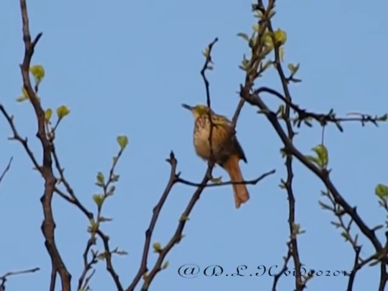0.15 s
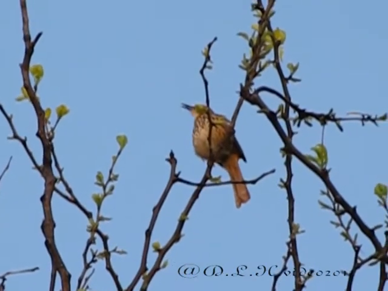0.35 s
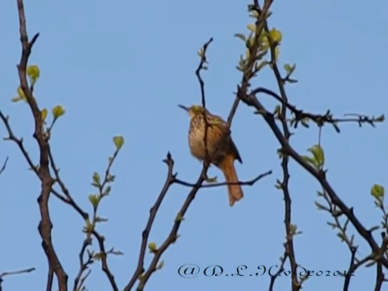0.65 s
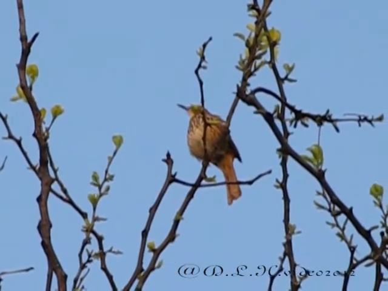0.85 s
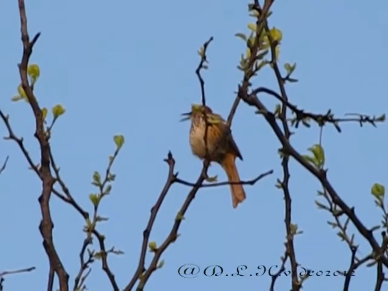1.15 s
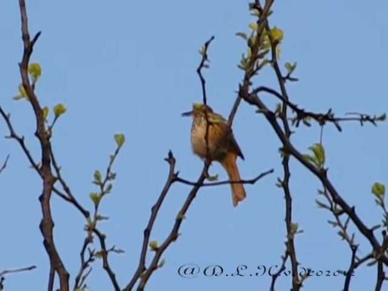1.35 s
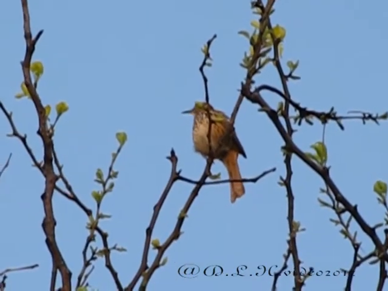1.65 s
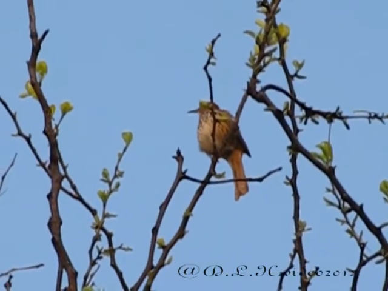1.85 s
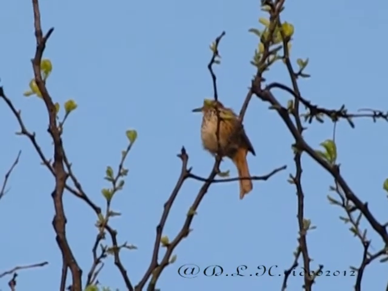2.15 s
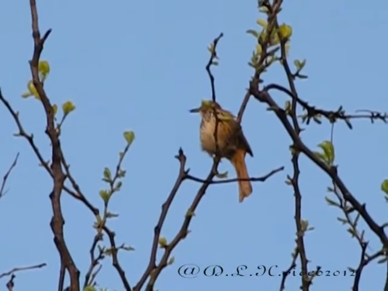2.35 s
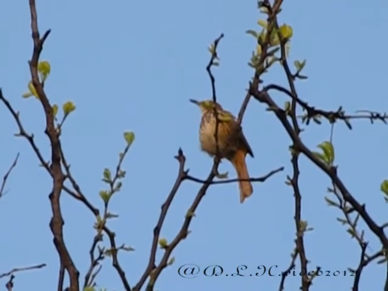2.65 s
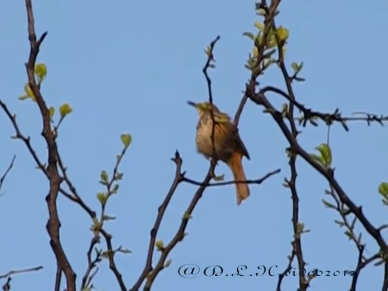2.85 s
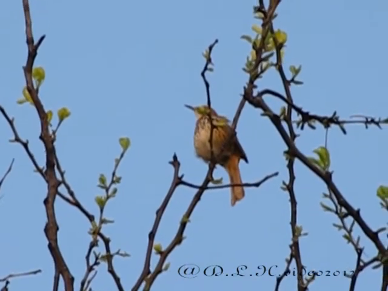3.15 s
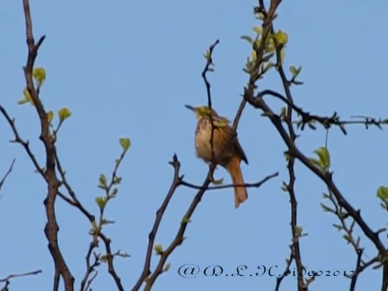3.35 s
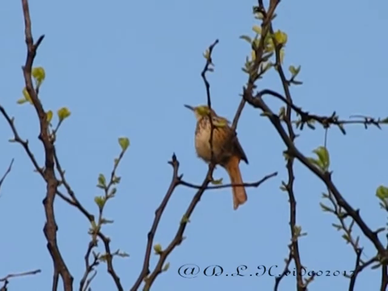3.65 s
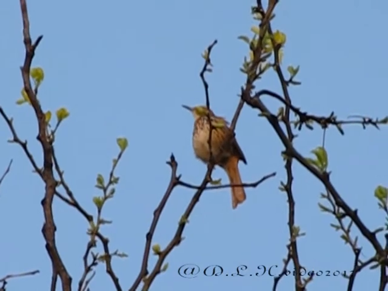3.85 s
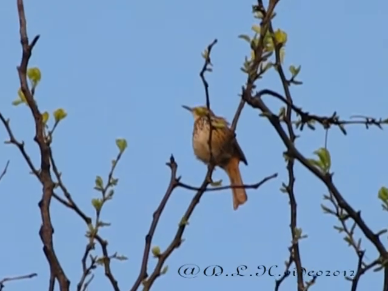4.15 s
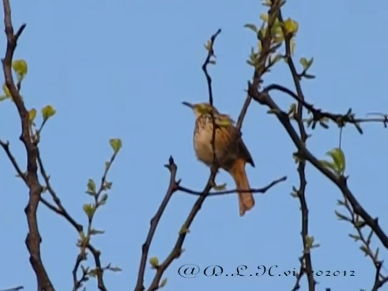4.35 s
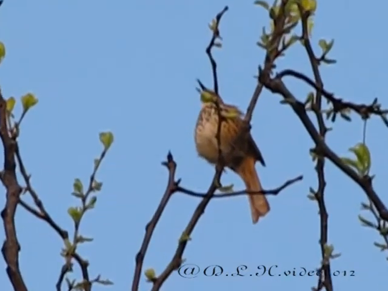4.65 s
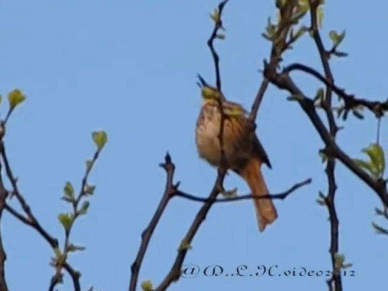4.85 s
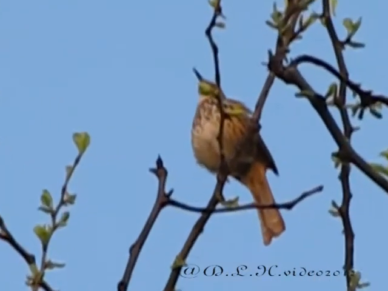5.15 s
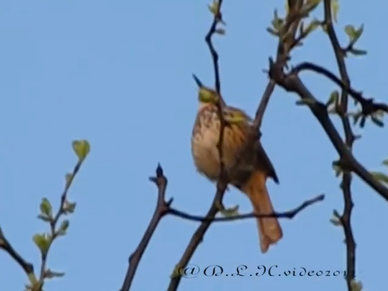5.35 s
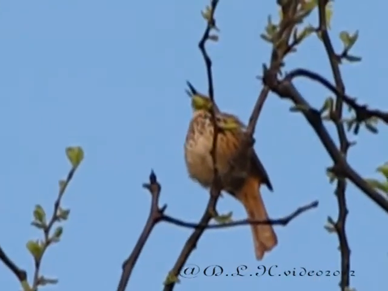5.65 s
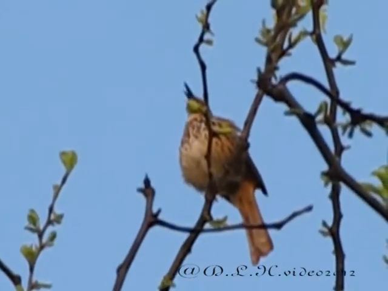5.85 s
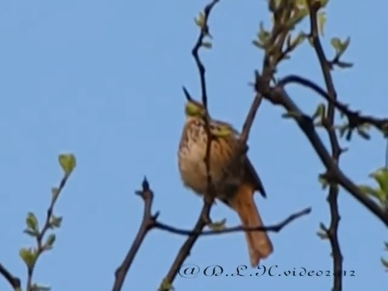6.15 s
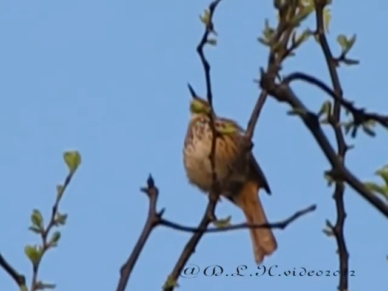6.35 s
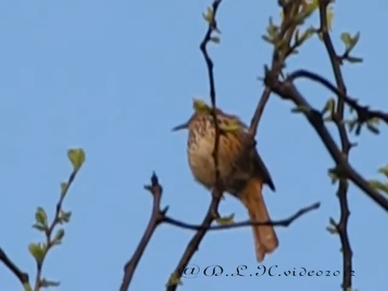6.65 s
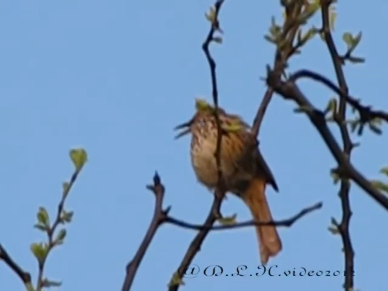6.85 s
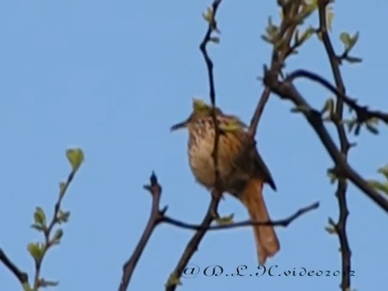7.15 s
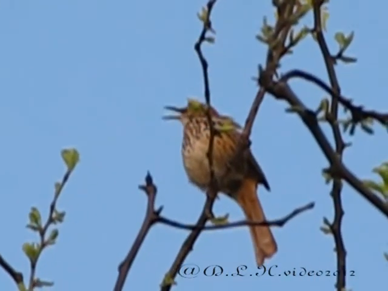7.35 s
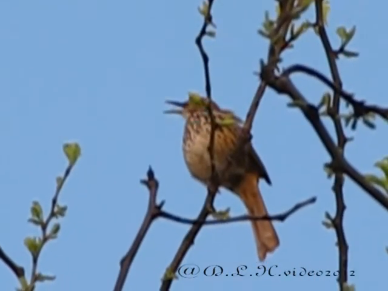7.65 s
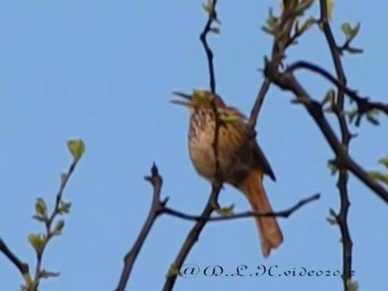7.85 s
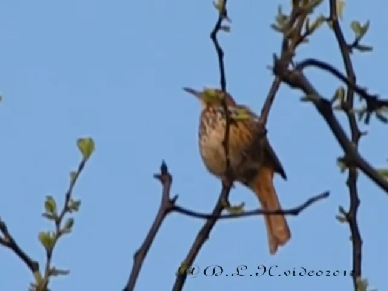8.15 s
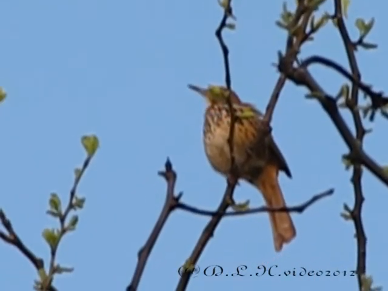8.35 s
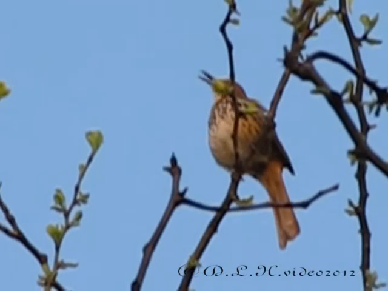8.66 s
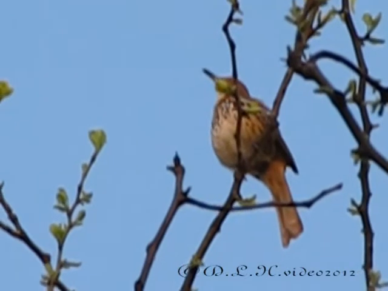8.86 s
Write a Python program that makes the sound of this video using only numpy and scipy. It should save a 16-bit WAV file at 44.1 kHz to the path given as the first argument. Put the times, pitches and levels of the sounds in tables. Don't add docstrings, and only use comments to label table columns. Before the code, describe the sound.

Close stereo capture outdoors by a distant road. One bird dominates, opening with rapid high warbles, moving through rough low whistles and trills, pausing, then giving bright repeated chirps and sliding high notes. Weak buzzy calls from other birds fill the gaps with airy reverberation. Handling clicks cluster before one second, and a hard knock lands just after three. Steady dull traffic rumble stays beneath.

```python
import sys
import numpy as np
from scipy import signal
from scipy.fft import rfft, irfft, next_fast_len
from scipy.io import wavfile
from scipy.ndimage import uniform_filter1d, map_coordinates

SR = 44100
rng = np.random.default_rng(int(sys.argv[2]) if len(sys.argv) > 2 else 0)


def boost_factor(decibels):
    exponent = np.asarray(decibels, float) / 20
    return 10 ** exponent


def output_pcm(signal):
    pcm = np.clip(np.atleast_2d(signal).T, -1, 1) * 32767
    wavfile.write(sys.argv[1], SR, np.round(pcm).astype(np.int16))


N = 396459

# (t/s after the start, f/Hz, level/dB)
FALL = [
    [(0, 5780, -25), (.018, 4550, -17), (.031, 4110, -18.5), (.076, 3300, -31)],
]
HOOK = [
    [(0, 1750, -33), (.011, 1997, -29), (.016, 2450, -28), (.024, 1780, -32), (.08, 1400, -39.5)],
    [(0, 2650, -31), (.016, 2900, -33.5), (.03, 2397, -33), (.085, 1895, -38)],
]
SWEEP = [
    [(0, 2420, -35), (.028, 3250, -22.5), (.054, 4060, -25.5)],
]
DROP = [
    [(0, 2074, -26.5), (.016, 1802, -27.5), (.05, 1650, -39)],
    [(.006, 2380, -27), (.024, 2000, -39)],
]
DUET = [
    [(0, 1570, -39), (.08, 1516, -41), (.21, 1320, -43)],
    [(.048, 1710, -29), (.06, 1980, -32), (.11, 2076, -29.5), (.15, 2020, -35), (.22, 2000, -36),
     (.27, 1900, -43)],
    [(.155, 2690, -49), (.19, 2740, -45), (.222, 2600, -51)],
]
ARCH = [
    [(0, 1800, -29), (.055, 1797, -29), (.09, 1930, -25), (.13, 1961, -25), (.175, 1746, -32)],
    [(.083, 2650, -40), (.11, 2550, -32.5), (.15, 2320, -35)],
]
BURR = [
    [(0, 1890, -34), (.03, 1696, -33), (.075, 2005, -31), (.17, 2102, -32), (.21, 1950, -33),
     (.28, 1750, -42)],
]
SWOOP = [
    [(0, 3020, -38), (.024, 3010, -25), (.048, 3700, -15.5), (.084, 2530, -19.5), (.11, 2290, -25.5),
     (.132, 2210, -40)],
]
DIVE = [
    [(0, 5650, -39), (.015, 5850, -32), (.03, 5970, -30), (.043, 5800, -30), (.052, 5100, -28.5),
     (.06, 3500, -18.5), (.065, 2700, -23.5), (.073, 2050, -32)],
]
DIP = [
    [(0, 4350, -31), (.012, 4130, -22.5), (.03, 3940, -19), (.055, 4000, -35.5)],
]
SLIDE = [
    [(0, 6300, -51), (.015, 6100, -41), (.045, 5220, -35.5), (.15, 4700, -34.5), (.174, 4710, -40)],
]
SCOOP = [
    [(0, 2965, -27), (.048, 2640, -20), (.08, 2890, -23), (.094, 3280, -20), (.135, 3310, -42.5)],
]
SAG = [
    [(0, 2985, -32), (.05, 2603, -26), (.095, 2570, -28), (.114, 2770, -26)],
    [(.125, 3160, -43), (.134, 3180, -22), (.146, 2880, -44)],
]
HOLD = [
    [(0, 4640, -43), (.015, 4720, -22.5), (.037, 4744, -19), (.069, 4744, -22.5), (.088, 4280, -39)],
]
TUCK = [
    [(-.006, 1600, -33), (0, 2500, -26), (.006, 1680, -31), (.02, 1560, -36), (.045, 1520, -40)],
]
RISE = [
    [(0, 1700, -35), (.05, 1835, -28), (.1, 2060, -28)],
]
BOW = [
    [(0, 2680, -37), (.012, 3250, -28.5), (.032, 2860, -17.5), (.05, 2640, -20.5), (.067, 1710, -32)],
    [(.072, 2260, -28), (.083, 2800, -36)],
]
FLICK = [
    [(-.008, 1735, -27), (0, 2922, -21.5), (.007, 1900, -26.5), (.026, 1565, -37.5), (.043, 1570, -38)],
]
PEEP = [
    [(0, 3930, -36), (.012, 4020, -28), (.034, 3900, -25), (.051, 4340, -31)],
]
TRILL = [
    [(0, 2070, -33), (.025, 2490, -25), (.044, 2500, -27), (.051, 3620, -19), (.058, 2450, -26),
     (.075, 2120, -34), (.09, 2330, -29)],
    [(.09, 2330, -29), (.1, 2620, -25), (.106, 3660, -18.5), (.113, 2430, -26), (.13, 2270, -31),
     (.145, 2420, -27)],
    [(.145, 2420, -27), (.158, 2620, -24), (.166, 3520, -20), (.174, 2620, -26), (.19, 2320, -34),
     (.213, 2120, -40)],
]
LEAD = [
    [(0, 3570, -32), (.012, 3650, -25), (.031, 3900, -19.5), (.047, 4050, -21)],
]
# (top f/Hz, bottom f/Hz at start, bottom f/Hz at end, swings per s)
CALLERS = [
    (4850, 3800, 2450, 45),
    (3590, 2260, 2270, 70),
    (4400, 3700, 3450, 95),
    (4250, 2900, 2480, 70),
]
LONG_CALL, SHORT_CALL, FLAT_CALL, MID_CALL = CALLERS


def thrasher():
    # (t/s, syllable; for a varied repeat also length times, pitch times, level/dB)
    hoarse_notes = [(.064, FALL, 1.03, 1.001, .1), (.304, FALL), (.927, HOOK, .95, .98, .1), (1.377, HOOK),
                    (1.076, SWEEP), (1.11, TRILL), (2.184, DROP, .7, .95, -3), (2.218, DUET),
                    (2.664, DROP, .95, .99, 3), (2.814, DROP, .7, 1.02, 3), (2.839, ARCH), (3.316, DROP),
                    (3.36, BURR)]
    clear_notes = [(4.427, SWOOP, .91, .975, -1.5), (4.635, DIVE), (4.84, SWOOP), (4.838, LEAD),
                   (4.436, LEAD, .6, .99, -4), (5.67, LEAD, .75, 1.005, -4), (5.667, SWOOP, 1.01, .99, .5),
                   (5.884, DIVE, 1.01, 1.001, -1.5), (6.788, PEEP), (6.85, SLIDE), (7.03, SCOOP),
                   (7.237, DIP), (7.296, DIP, 1.5, 1.125, .1), (7.355, SCOOP, 1.2, .99, -2),
                   (7.626, DIP, .95, 1.01, .1), (7.691, HOLD), (7.755, SAG), (8.487, RISE), (8.628, BOW),
                   (8.718, FLICK), (8.77, TUCK), (8.935, RISE, .9, 1.05, -1)]
    # (f/Hz, level/dB per Hz)
    rasp = [(2650, -38), (4500, -2), (4870, -8), (5290, -11), (6890, -1), (8270, 1), (9180, 1),
            (10600, -12), (12300, -2), (14800, -8), (16200, -30)]
    air = unit(filtered(rng.standard_normal(N), lambda hz: boost_factor(along(rasp, hz))))

    tone, size, low = whistle(sung(hoarse_notes), False, jitter=.009, flutter_db=1.4)
    hoarse = voiced(tone, size, drive_db=2.5)
    hoarse += boost_factor(-28) * uniform_filter1d(low, size=900) * air

    sung_clear = whistle(sung(clear_notes), False, jitter=.0035, flutter_db=1.0)
    warbled = whistle(warbles(), True, jitter=.003, flutter_db=.6)
    tone, size, low = [a + b for a, b in zip(sung_clear, warbled)]
    breath = boost_factor(-40) * uniform_filter1d(size, size=900) + boost_factor(-36) * low
    return hoarse + voiced(tone, size, drive_db=0.0) + breath * air


def sung(song):
    # (share of pitch, level/dB)
    burr_parts = [(2 / 3, -12), (4 / 3, -18), (5 / 3, -27)]
    notes = []
    for start, syllable, *change in song:
        length, pitch, db = change or (1, 1, 0)
        parts = [(0.99, 0)] + (burr_parts if syllable == BURR else [])
        for voice in syllable:
            s, hz, level_db = np.transpose(voice)
            s = start + length * np.sort(s)
            for share, part_db in parts:
                notes.append(np.transpose([s, pitch * share * hz, level_db + db + part_db]))
    return notes


def warbles(count=9):
    # (t/s, time a swing/s, level/dB)
    warble_at = [
        (0.0128, .0066, -23.5),
        (0.2473, .0073, -22.5),
    ]
    k = np.arange(count)
    u = k / (count - 1)
    tops_hz = 4880 + (6200 - 4880) * np.sin(1.9 * u)
    troughs_hz = 2150 + 2480 * u ** 1.9
    hz = np.where(k % 2, troughs_hz, tops_hz)
    shape_db = -3.5 * (k % 2) + 16 * (k == count - 1)
    return [np.transpose([s + swing * k, hz, db + shape_db]) for s, swing, db in warble_at]


def whistle(notes, eased, jitter, flutter_db):
    # (from t/s, to t/s, quavers per s, share of pitch)
    tremble = (7.03, 7.87, 52, .023)
    start, end, rate, share = tremble
    tone, size, low = np.zeros(N + SR, complex), np.zeros(N + SR), np.zeros(N + SR)
    for note in notes:
        s, hz, db = np.transpose(note)
        t = np.arange(s[0], max(s[-1], s[0] + .01), 1 / SR)
        step = np.interp(t, s, np.arange(len(s)))
        if eased:
            step = np.floor(step) + .5 - .5 * np.cos(np.pi * (step % 1))
        pitch = uniform_filter1d(np.interp(step, np.arange(len(s)), hz), size=130, mode="nearest")
        deep = np.clip((2300 - pitch) / 250, 0, 1)
        pitch = pitch * (1 + jitter * (1 + 4 * deep) * wobble(400, len(t)))
        quavers = start <= s[0] < end and hz[0] < 3200
        pitch = pitch * (1 + share * quavers * np.sin(2 * np.pi * rate * (t - t[0])))
        edge = np.clip(np.minimum((t - t[0]) / .003, (t[-1] - t) / .005), 0, 1)
        flutter = flutter_db * (1.5 + 0.5 * deep) * wobble(120.3, len(t))
        level = 2 ** .5 * edge * boost_factor(np.interp(t, s, db) + flutter)
        first = round(s[0] * SR)
        span = slice(first, first + len(t))
        tone[span] += level * np.exp(2j * np.pi * np.cumsum(pitch) / SR)
        size[span] += level
        low[span] += level * deep
    return tone[:N], size[:N], low[:N]


def voiced(tone, size, drive_db):
    # (order, level/dB)
    overtones = [(2, -18.5), (3, -29), (4, -34.5), (5, -38)]
    # (f/Hz, level/dB)
    beak = [(900, -30), (3700, -8), (5200, -4), (7300, 3.5), (9500, -3), (12000, 4.5), (16000, -30)]
    # (t/s, overtone level/dB)
    gape = [(0, 1), (1.1, 1), (1.13, 5), (1.35, 3), (4, 0), (4.4, 5), (6, 5), (6.8, 1), (7.33, 0),
            (7.37, 5), (7.55, 3), (7.62, -1), (7.75, -1), (7.78, 5), (8.4, 0), (8.6, -5), (8.99, -2)]
    turn = tone / (size + 1e-9)
    gape_db = curves(gape)[0] + 2.5 * wobble(200)
    closing = 0.03 * (size / .05) ** .2 * np.tanh(size / .008) * boost_factor(gape_db)
    blur = np.exp(.16j * wobble(500))
    upper = 0
    for order, db in overtones:
        upper = upper + boost_factor(db + drive_db * (order - 2.5)) * closing * (turn * blur) ** order
    return tone.real + filtered(upper.real, lambda hz: boost_factor(along(beak, hz)))


def echoes(x, delay, early_db):
    # (f/Hz, fade/s)
    trees = [(1500, 0.99), (3000, 0.67), (4700, 0.56), (6000, .3), (10000, 0.14)]
    hz, t, z = signal.stft(rng.standard_normal((2, SR)), SR, nperseg=256)
    fade = boost_factor(-60 * t / along(trees, hz)[:, None])
    tail = signal.istft(z * fade, SR, nperseg=256)[1]
    age = np.arange(tail.shape[1]) / SR - delay
    early = 1 + boost_factor(early_db - 60 * np.abs(age) / 0.085)
    tail = (tail + 0.061 * tail[::-1]) * (age > 0) * early
    wet = signal.fftconvolve(x[None], tail / np.linalg.norm(tail[0]), axes=1)[:, :N]
    stir = 1.6 * wobble(70)
    return np.cos(stir) * wet + np.sin(stir) * wet[::-1] * [[1], [-1]]


def far_birds():
    # (t/s, length/s, caller, pitch times, level/dB)
    buzzes = [(.639, .1, LONG_CALL, 0.98, -42), (.845, .203, FLAT_CALL, .98, -49.5),
              (1.189, .099, LONG_CALL, 1.06, -42), (1.979, 0.057, SHORT_CALL, 1.01, -49),
              (2.107, 0.09, LONG_CALL, 1.01, -40), (2.269, .18, FLAT_CALL, 1.01, -48.5),
              (2.498, .1, MID_CALL, 1, -48.5), (3.085, .04, MID_CALL, .9, -54),
              (3.68, 0.09, LONG_CALL, 1.01, -41.5), (4.162, .28, FLAT_CALL, 1.01, -50.5),
              (4.408, .039, FLAT_CALL, 1.15, -44), (5.452, .043, SHORT_CALL, .98, -46.5),
              (5.631, .09, LONG_CALL, .99, -43.5), (6.33, .057, SHORT_CALL, 1.15, -58),
              (6.714, 0.051, SHORT_CALL, 0.98, -49.5), (6.845, 0.068, LONG_CALL, 0.96, -46),
              (7.114, 0.15, FLAT_CALL, 2, -59.5), (7.134, .058, LONG_CALL, .89, -45),
              (8.871, .09, LONG_CALL, 1.01, -34)]
    # (t/s, length/s, start f/Hz, end f/Hz, level/dB)
    far_glides = [(1.64, .03, 6990, 5820, -68), (1.871, .118, 2980, 2980, -51),
                  (2.505, .02, 6180, 4890, -57), (2.56, .015, 5450, 3940, -50), (5.2, .04, 6260, 5400, -65),
                  (5.24, .04, 5000, 2370, -52), (6.3, .04, 2600, 2800, -53), (6.34, .1, 2950, 2800, -52),
                  (6.545, .03, 1650, 2300, -53), (6.59, .05, 2100, 1550, -53),
                  (6.615, .035, 2300, 2900, -53), (6.65, .065, 2900, 2830, -52),
                  (8.535, .042, 3270, 4460, -58), (8.577, .042, 4460, 3410, -54),
                  (8.685, .015, 4400, 3220, -49), (8.725, .016, 3900, 3130, -48),
                  (7.99, .02, 2000, 3000, -52), (8.035, .045, 2950, 2950, -44),
                   (8.125, .022, 3000, 2000, -50), (8.15, .045, 2950, 2750, -47),
                   (8.235, .018, 2900, 2000, -50), (8.262, .04, 2850, 2700, -48),
                   (8.4, .045, 3250, 3150, -49), (8.46, .03, 4400, 4400, -55)]
    out = np.zeros(N + SR)
    for s, length, caller, pitch, db in buzzes:
        top_hz, start_hz, end_hz = pitch * np.array(caller[:-1])
        u = np.arange(0, 1, 1 / (length * SR))
        swings = caller[-1] * (length * u - .008) + .04 * wobble(50, len(u))
        saw = .5 + .5 * np.cos(2 * np.pi * swings)
        bottom = start_hz + (end_hz - start_hz) * u ** .5
        hz = (bottom + (top_hz - bottom) * saw) * (1 + .022 * wobble(900, len(u)))
        phase = 2 * np.pi * np.cumsum(hz) / SR
        grain_db = 6 * wobble(220, len(u)) - 6 * saw ** 4
        swell = np.clip(np.minimum(u / 0.067, (1 - u) / 0.17), 0, 1) * boost_factor(db + grain_db)
        out[round(s * SR):][:len(u)] += swell * (np.sin(phase) + boost_factor(-25) * np.sin(2 * phase))
    thin = [[(s, a, db), (s + length, b, db)] for s, length, a, b, db in far_glides]
    return out[:N], whistle(thin, False, jitter=.004, flutter_db=2)[0].real


def ticks():
    # (t/s, knock peak level/dB, snap peak level/dB, left-right/dB)
    touches = [(.4232, -30, -27, 3), (.4316, -24, -34, 3), (.7882, -19, -29, 0), (.7946, -11, -24, 1),
               (.7995, -15, -34, 1), (.8075, -18, -29, 0), (.8115, -18, -34, 0), (.8205, -18, -33, 0),
               (1.7215, -40, -35, 1), (1.7475, -40, -37, 0), (2.8865, -34, -29, 4), (3.146, -40, -35, 0),
               (3.2862, -6, -17, -8), (6.334, -32, -34, 0)]
    # (f/Hz, width/Hz, level/dB)
    shell = [(1000, 2200, 0), (3300, 800, -5)]
    snap = [(7500, 2500, 0), (12000, 3000, -14)]
    bright, dull = np.zeros((2, 2, N + SR))
    t = np.arange(1300) / SR
    push = np.exp(-(t / .00004 - 2.5) ** 2)
    for s, knock_db, snap_db, pan_db in touches:
        rattle = boost_factor(-12 - 60 * t / .03) * rng.standard_normal((2, len(t)))
        thuds = 2.6 * uniform_filter1d(rattle + rattle[::-1] * .8, size=9)
        sides = boost_factor(pan_db * np.array([[.5], [-.5]]))
        first = round(s * SR)
        span = slice(first, first + len(t))
        rattle_db = min(snap_db, -32) - 6
        thud_db = knock_db if knock_db < -9 else -27
        bright[:, span] += 2.2 * sides * (boost_factor(snap_db) * push + boost_factor(rattle_db) * rattle)
        dull[:, span] += 2.9 * sides * (boost_factor(knock_db) * push + boost_factor(thud_db) * thuds)
    return filtered(bright[:, :N], resonances(snap)) + filtered(dull[:, :N], resonances(shell))


def rustles():
    # (t/s, length/s, level/dB, brightness/dB a decade)
    bursts = [(.42, .05, -57, -10), (1.7, .07, -60, -12), (3.04, .135, -47, -16), (3.175, .1, -50, -28),
              (4.17, .27, -57, -8), (4.685, .04, -50, -10), (5.935, .04, -50, -10), (7.3, .12, -56, -12),
              (7.75, .06, -54, -10), (8.8, .08, -54, -14)]
    out = np.zeros((2, N + SR))
    for s, length, db, tilt_db in bursts:
        n = round(length * SR)
        hz = np.fft.rfftfreq(n, 1 / SR) + 1
        colour = boost_factor(tilt_db * np.log10(hz / 3000)) / (1 + (2200 / hz) ** 4)
        noise = irfft(rfft(rng.standard_normal((2, n))) * colour, n)
        swell = boost_factor(db + 3.5 * wobble(250, n)) * np.sin(np.pi * np.arange(n) / n)
        out[:, round(s * SR):][:, :n] += swell * unit(noise + .6 * noise[::-1])
    return out[:, :N]


def traffic():
    # (t/s, rumble level/dB, tyre roar level/dB)
    road = [(0.0, -32, -34.5), (0.35, -32, -35), (8.99, -32, -36)]
    # (t/s, first level/dB, third level/dB)
    engine = [(0.0, -37.5, -58), (2.45, -43, -43), (8.99, -35, -48)]
    # (f/Hz, level/dB per Hz)
    rumble_colour = [(8.8, -48), (15, -6.5), (50, -1), (107, 0), (171, -13), (205, -10.5), (260, -18),
                     (340, -32), (570, -120)]
    roar_colour = [(88, -26.5), (150, -2), (189, -6.5), (253, -3), (374, -5.5), (491, -5), (1050, -7),
                   (1910, -21), (2770, -22.5), (3560, -25.5), (4860, -33.5), (5680, -38), (9050, -44.5),
                   (15600, -54)]
    rumble_db, roar_db = curves(road)
    first_db, third_db = curves(engine)
    phase = 2 * np.pi * np.cumsum(69.9 * (1 + 0.00792 * wobble(2.5))) / SR
    drone = boost_factor(first_db + 4.0 + 2.2 * wobble(5.4)) * np.sin(phase)
    drone += boost_factor(third_db + 2.3 * wobble(4.0)) * np.sin(3 * phase)
    rumble = boost_factor(rumble_db - 1.5) * rush(rumble_colour, patchy_db=-0.53)
    roar = boost_factor(roar_db + 1.5 + .6 * wobble(2.195)) * rush(roar_colour, patchy_db=0.52)
    return drone + rumble + roar


def rush(spectrum, patchy_db):
    # (f/Hz, likeness from 0 to 1)
    alike = [(30, 0.9), (150, 0.97), (400, 0.91), (900, 0.76), (2500, 0), (6000, 0), (12000, 0.053)]
    z = signal.stft(rng.standard_normal((2, N)), nperseg=512)[2]
    field = uniform_filter1d(rng.standard_normal(z.shape[1:]), size=5, axis=0)
    field = uniform_filter1d(field, size=12, axis=1)
    pair = signal.istft(z * boost_factor(patchy_db * unit(field)), nperseg=512)[1][:, :N]

    def colour(hz):
        turn = np.arccos(np.clip(along(alike, hz), -1, 1)) / 2
        return boost_factor(along(spectrum, hz)) * [np.cos(turn), np.sin(turn)]

    mid, side = filtered(pair, colour)
    return np.array([mid + side, mid - side]) / np.std(mid)


def unit(x):
    return x / np.sqrt(np.mean(np.abs(x) ** 2) + 1e-20)


def along(points, hz):
    f, v = np.transpose(points)
    return np.interp(np.log(hz + 1), np.log(f + 1), v)


def curves(rows):
    s, *cols = np.transpose(rows)
    return [np.interp(np.arange(N) / SR, s, c) for c in cols]


def wobble(rate, n=N):
    knots = rng.standard_normal(int(n * rate / SR) + 4)
    return map_coordinates(knots, [np.arange(n) * rate / SR])


def filtered(x, response):
    m = next_fast_len(N + 8192)
    return irfft(rfft(x, m) * response(np.fft.rfftfreq(m, 1 / SR)), m)[..., :N]


def resonances(modes):
    def response(f):
        total = 0
        for k, (c, w, db) in enumerate(modes):
            total = total + (-1) ** k * boost_factor(db) * 1j * f * w / (c * c - f * f + 1j * f * w)
        return total
    return response


def scene():
    near = thrasher()
    chirps, whistles = far_birds()
    leaves = .7 + 1.3 * np.tanh(wobble(230))
    singer = near + boost_factor(-6.5) * echoes(near * leaves, .01, early_db=12.5)
    far = boost_factor(2.5) * chirps + boost_factor(-.5) * whistles
    far = far + boost_factor(4.5) * echoes(chirps + 0.3 * whistles, 0.0045, early_db=-0.5)
    return singer + far + ticks() + rustles() + traffic()


def roll_off(x):
    return signal.sosfilt(signal.butter(12, 15750, fs=SR, output="sos"), x)


def record(dry):
    # (f/Hz, left-right/dB)
    side_lean = [(60, 1.0), (180, 0.0), (550, -0.5), (1650, -2.0), (4970, 0.5), (15000, 2)]

    def ports(hz):
        level = boost_factor(along(side_lean, hz) * [[.5], [-.5]])
        phase = 0.29 * hz / 4000 * np.array([[1], [-1]])
        return (hz < 15800) * level * np.exp(1j * phase)

    return roll_off(filtered(dry, ports))


dry = scene()
out = record(dry)
output_pcm(out)
```